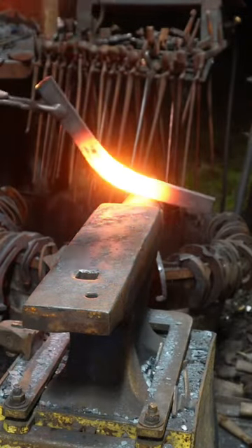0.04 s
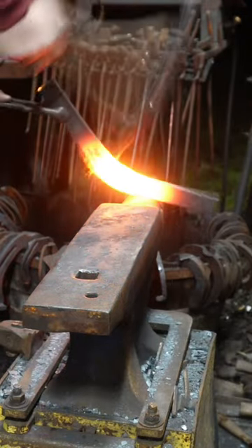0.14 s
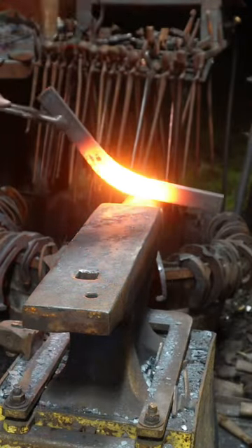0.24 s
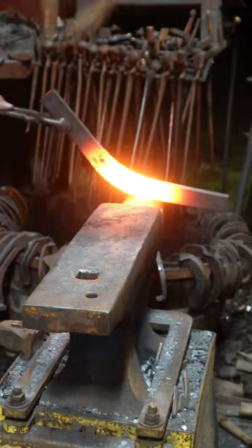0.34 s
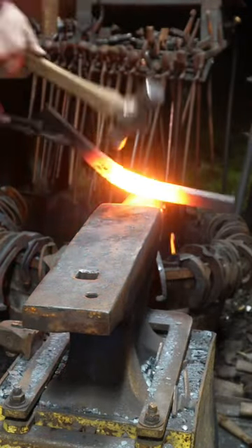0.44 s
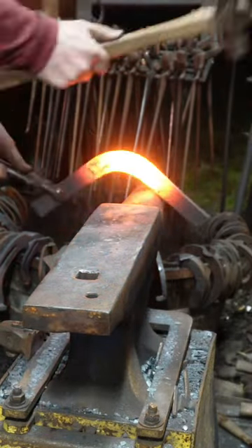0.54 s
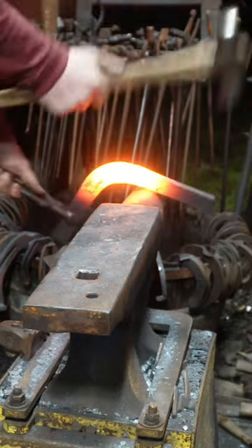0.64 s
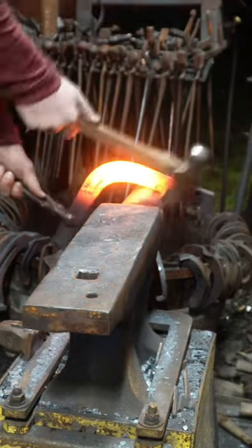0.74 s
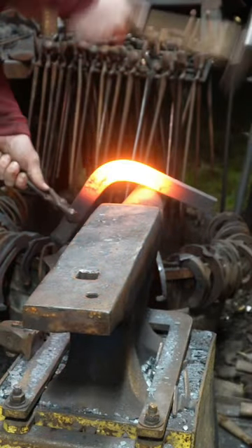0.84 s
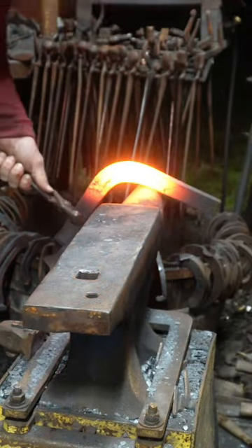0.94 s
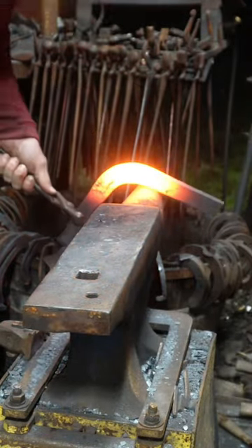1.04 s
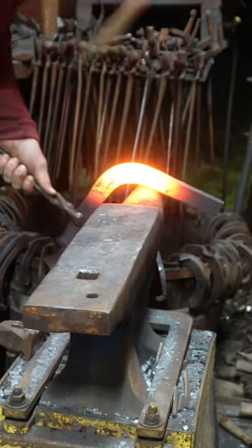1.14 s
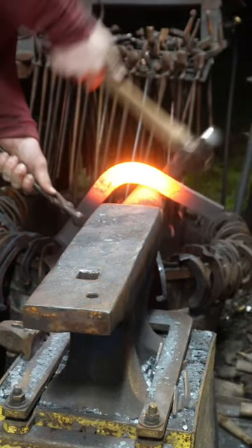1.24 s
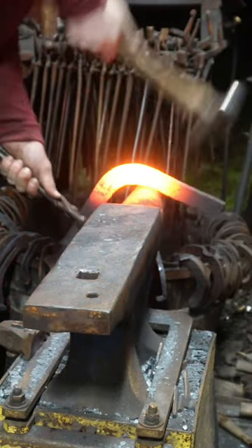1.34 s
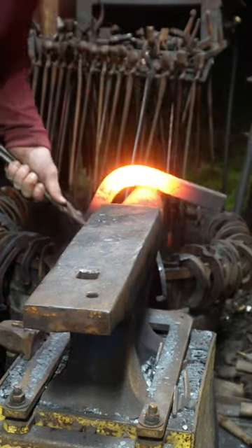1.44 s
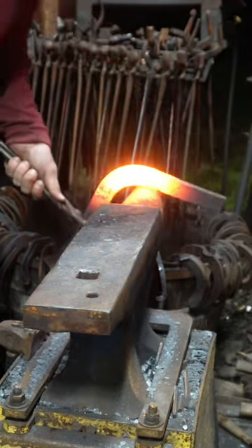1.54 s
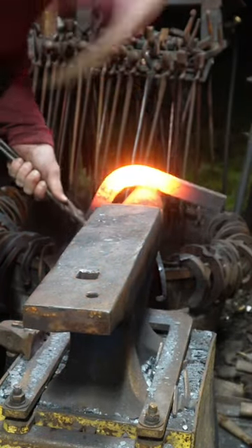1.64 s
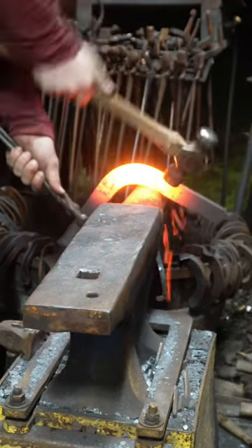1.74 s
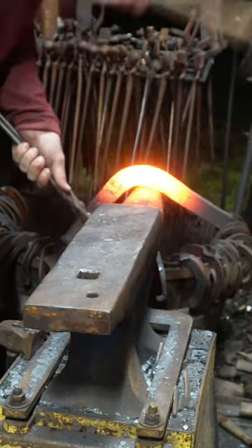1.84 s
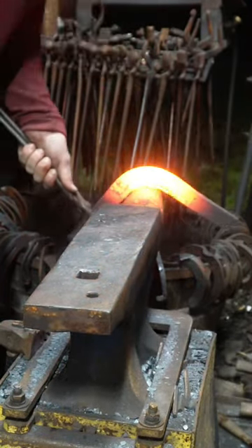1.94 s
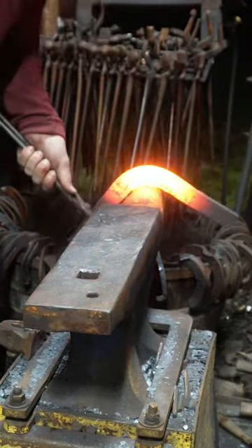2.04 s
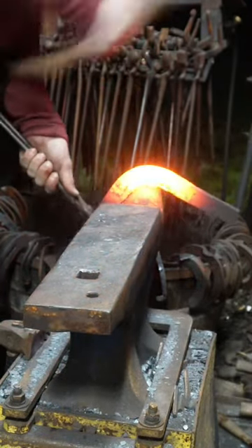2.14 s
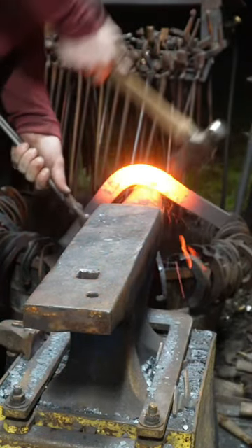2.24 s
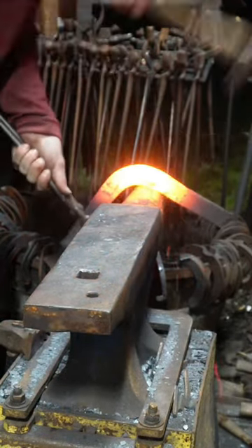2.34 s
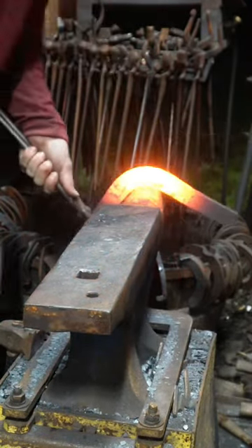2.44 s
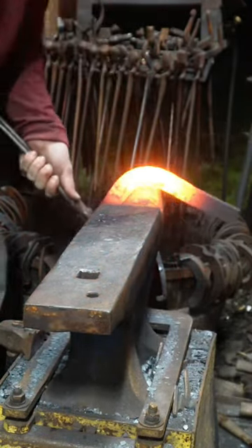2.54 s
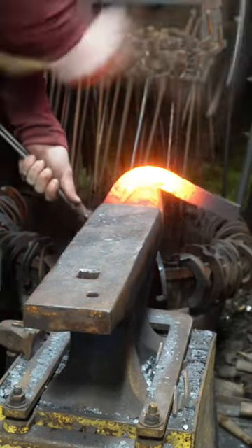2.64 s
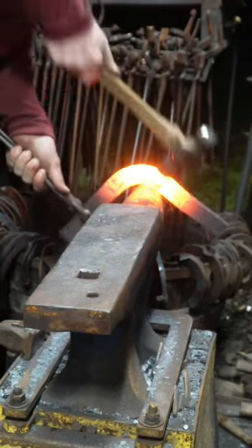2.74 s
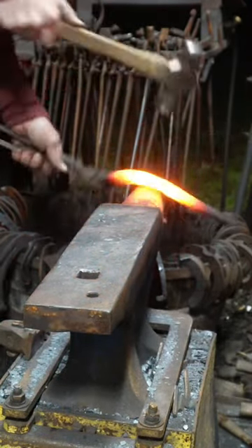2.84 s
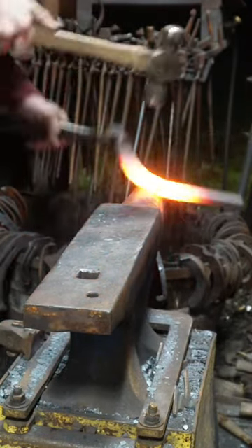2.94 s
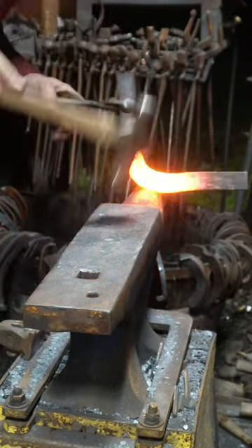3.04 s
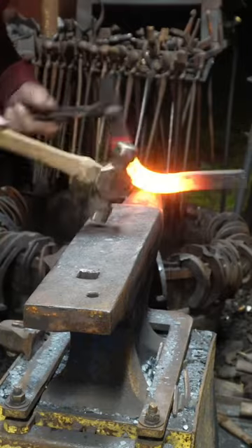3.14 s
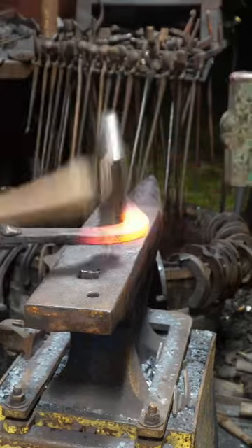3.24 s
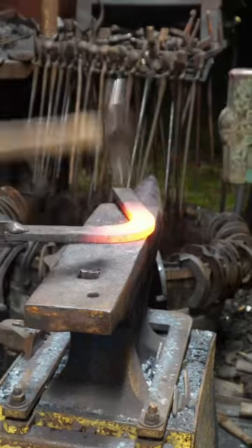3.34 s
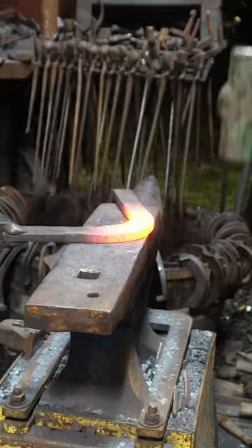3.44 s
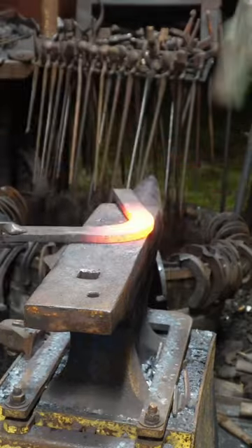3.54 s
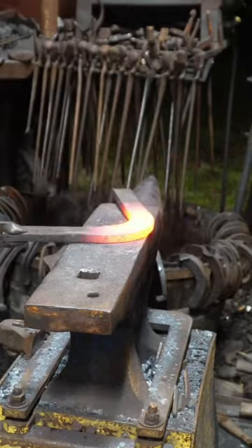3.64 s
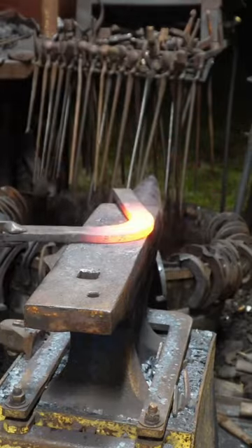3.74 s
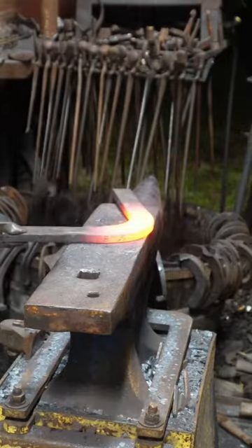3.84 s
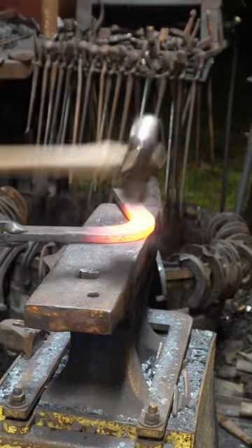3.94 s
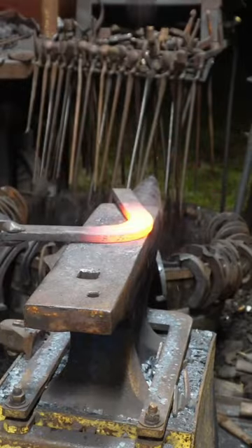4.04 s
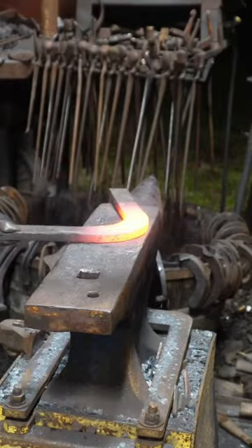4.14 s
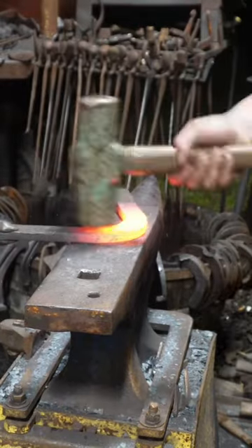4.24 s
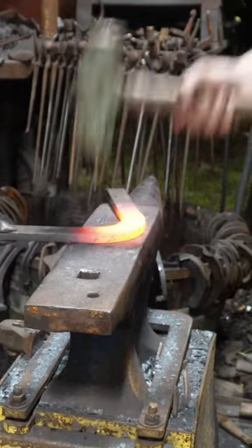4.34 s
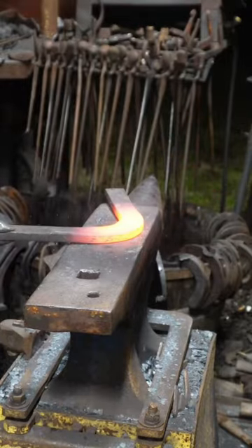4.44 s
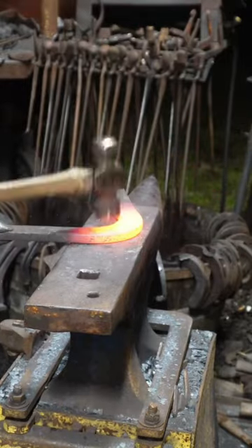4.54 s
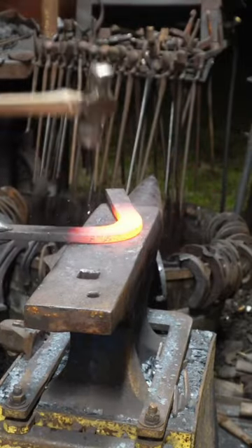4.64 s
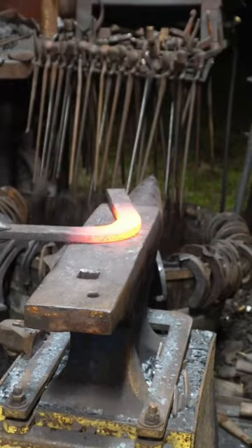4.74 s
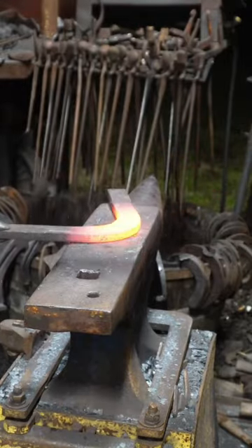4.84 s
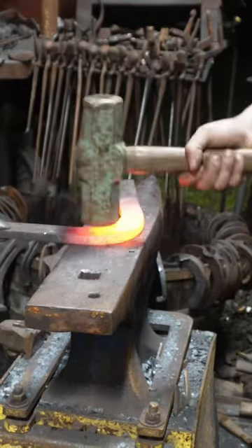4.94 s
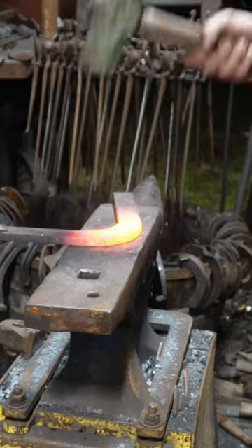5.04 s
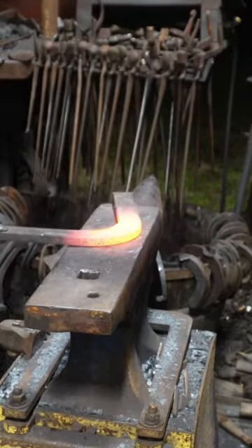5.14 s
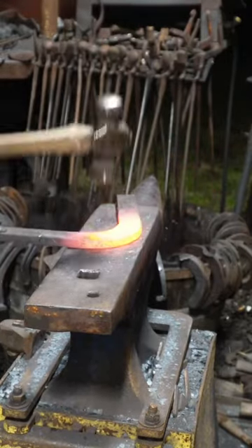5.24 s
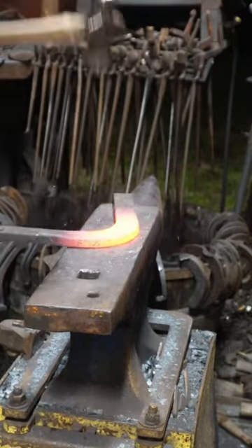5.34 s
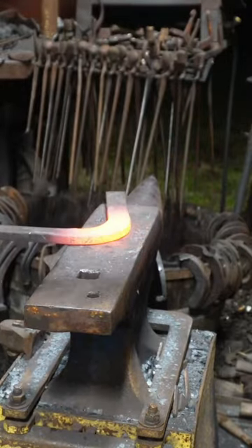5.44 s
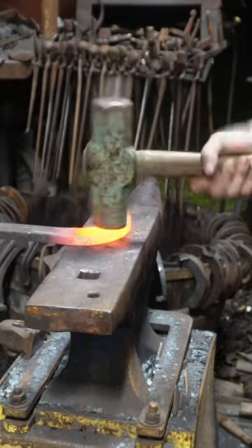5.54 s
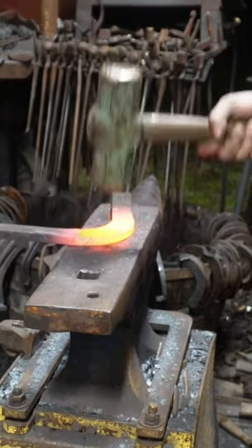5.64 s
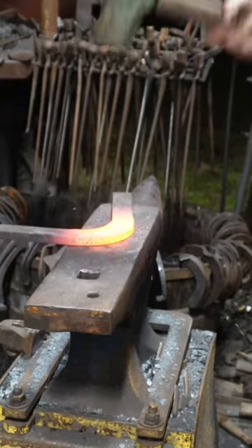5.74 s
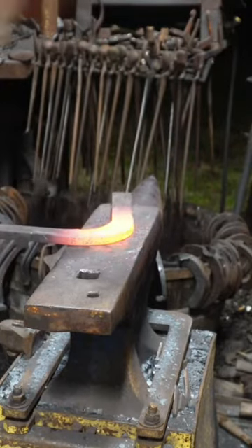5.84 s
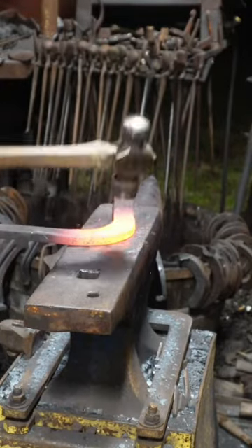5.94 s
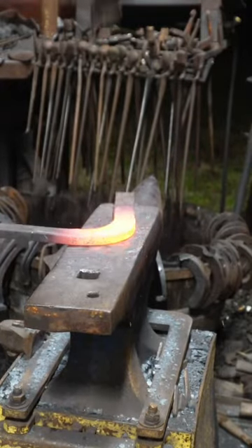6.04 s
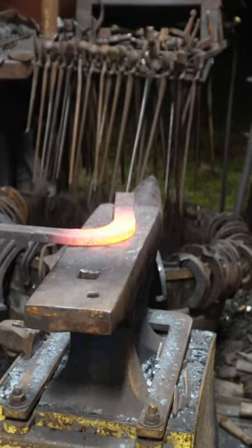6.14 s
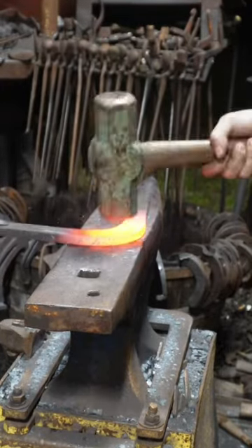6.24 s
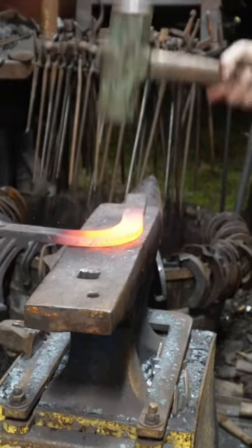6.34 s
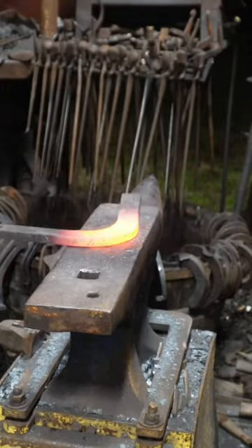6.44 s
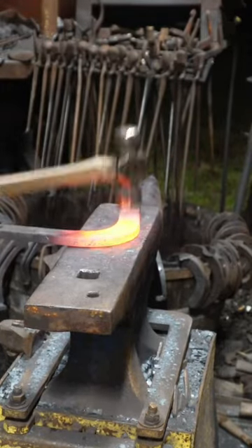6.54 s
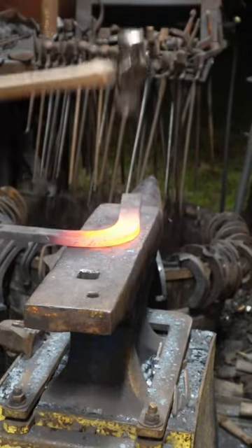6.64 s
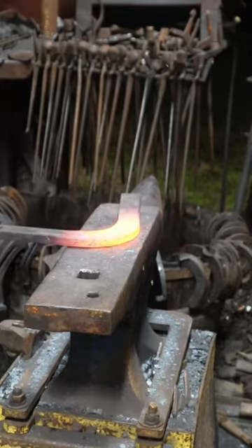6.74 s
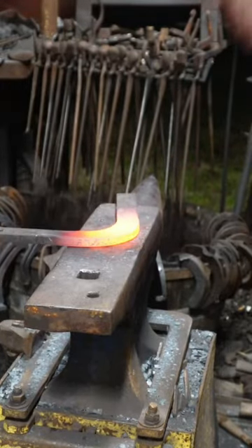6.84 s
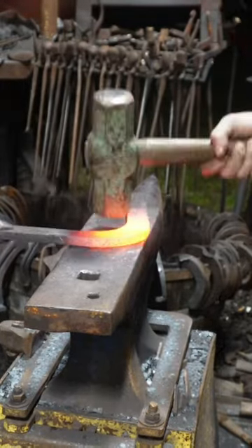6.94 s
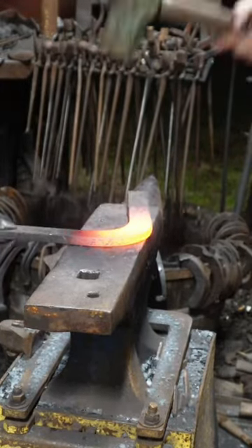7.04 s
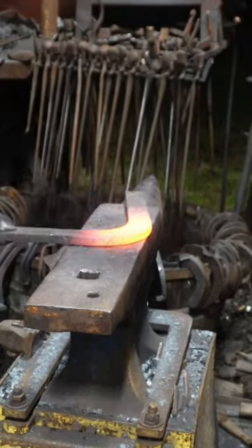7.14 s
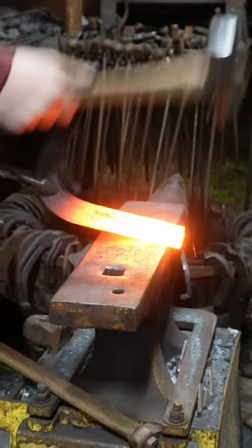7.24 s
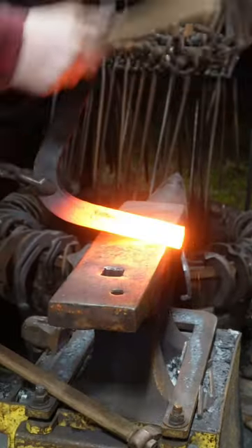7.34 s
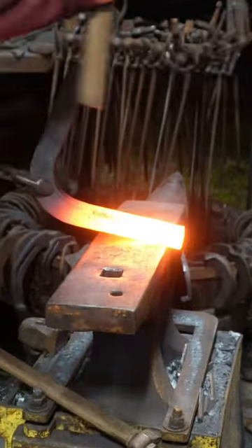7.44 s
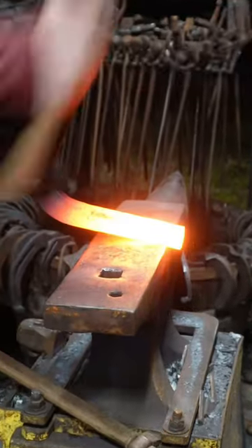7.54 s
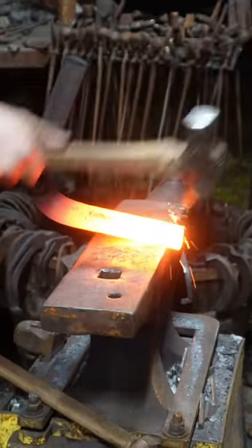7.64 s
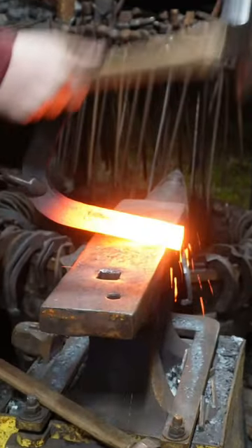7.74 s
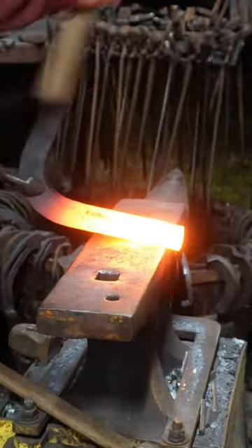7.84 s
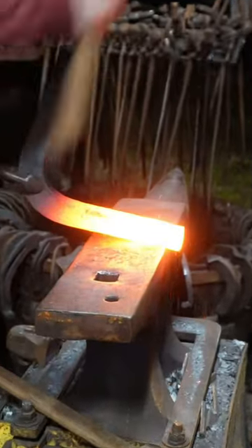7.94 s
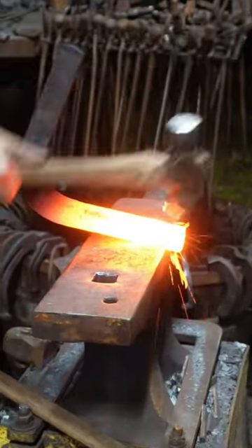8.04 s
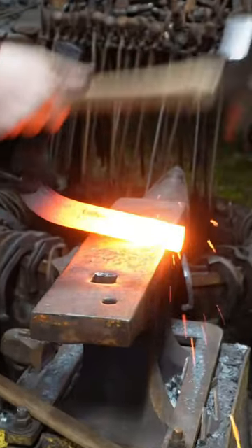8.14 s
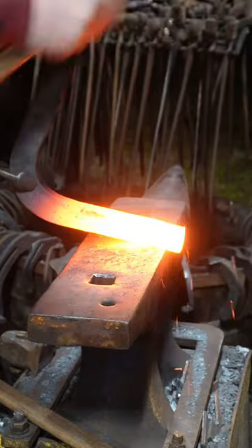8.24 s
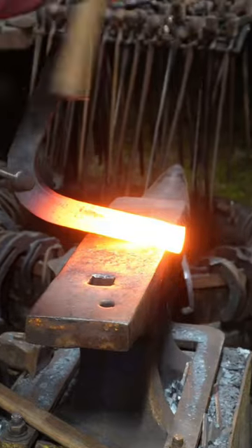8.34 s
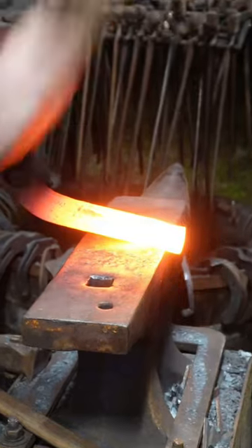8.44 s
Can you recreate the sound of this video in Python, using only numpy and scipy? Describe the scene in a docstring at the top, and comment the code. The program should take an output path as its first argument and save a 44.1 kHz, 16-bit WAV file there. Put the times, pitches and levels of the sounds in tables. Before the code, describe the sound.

Sharp, ringing hammer and sledgehammer blows strike a steel bar on an anvil, with short workshop echo and a steady forge hum and hiss.

```python
"""A smith's hand hammer bends a hot steel bar on an anvil; for a while a striker's sledge answers.
Each blow is a contact crack, a few ringing steel partials and a burst of workshop echo, squeezed by
a fast limiter. Behind them the forge hums and its air hisses. The opening sounds wider.
At three moments any ringing stops short and the forge shifts in level."""
import sys
import numpy as np
from scipy import signal
from scipy.fft import rfft, irfft
from scipy.io import wavfile
from scipy.ndimage import uniform_filter1d, minimum_filter1d

SR = 44100
rng = np.random.default_rng(int(sys.argv[2]) if len(sys.argv) > 2 else 0)


def generate_wav(sig):
    """Save sig (samples, or channels by samples) to the path in sys.argv[1] as 16-bit PCM at SR."""
    pcm = np.round(np.clip(np.atleast_2d(sig).T, -1, 1) * 32767).astype(np.int16)
    wavfile.write(sys.argv[1], SR, pcm)


N = 373968
TIME_S = np.arange(N) / SR
AGE_S = TIME_S[:16384]   # time since impact

# moments when ringing stops short and the forge level shifts: time_s
BREAKS_S = [0.45, 3.125, 7.205]


def from_db(db):
    """Decibels to gain."""
    return np.exp(np.asarray(db) * (np.log(10) / 20))


def at_hz(points, hz):
    """Interpolate a table over log frequency."""
    known_hz, values = np.transpose(points)
    return np.interp(np.log(hz + 1e-9), np.log(known_hz), values)


def drift(axis, knots_per_unit):
    """Random curve through unit-variance knots."""
    knots = rng.standard_normal(1024)
    return np.interp(axis * knots_per_unit, np.arange(len(knots)), knots)


def stereo_noise(colour, size):
    """Coloured noise, mono in the bass: (hz, stereo spectrum)."""
    # left-right likeness: freq_hz, correlation
    likeness = [(60, 1), (300, 1), (700, 1), (1400, 0.99), (2900, 0.99), (5000, 0.65), (8000, 0.2),
                (15000, 0.42)]
    hz = np.arange(size // 2 + 1) * SR / size
    mid, side = rfft(rng.standard_normal((2, size)))
    alike = at_hz(likeness, hz)
    gain = from_db(at_hz(colour, hz))
    gain /= np.sqrt(np.mean(gain ** 2))
    return hz, gain * (np.sqrt((1 + alike) / 2) * mid + np.sqrt((1 - alike) / 2) * side * [[1], [-1]])


def forge(flutter_db=1.0, waver_rad=0.11, fade_s=0.21):
    """The forge sings one note over the rush of its air: (hum, hiss)."""
    # forge note: pitch_hz, level_db
    harmonics = [(699.9, 0), (1399.8, -27)]
    # air rush spectrum: freq_hz, level_db
    air_colour = [(40, -3), (100, -32), (150, -29), (220, -2), (265, -12), (380, 2.5), (550, -4.5),
                  (1100, -1.5), (1500, 1), (2800, -3.5), (5300, -5), (7500, -16.5), (10000, -20.5),
                  (15000, -40.5)]
    # forge level, one row per stretch between breaks: hum_db, hiss_db
    levels = [(-39.5, -46.5), (-36, -41.5), (-36.5, -40), (-33.5, -41)]
    steps_db = np.transpose(levels)[:, np.searchsorted(BREAKS_S, TIME_S)]
    hum_db, hiss_db = uniform_filter1d(steps_db, size=int(fade_s * SR))
    wander_rad = waver_rad * drift(TIME_S, 47) + 1.8 * drift(TIME_S, 1.5)
    hum = sum(from_db(db) * np.sin(2 * np.pi * hz * TIME_S + wander_rad) for hz, db in harmonics)
    hiss = irfft(stereo_noise(air_colour, N)[1], N)
    hum_db += flutter_db * drift(TIME_S, 30)
    return np.sqrt(2) * hum * from_db(hum_db), hiss * from_db(hiss_db)


def widen(x, smear_s=0.0036, until_s=0.48, side_db=-2):
    """A short diffuse copy, opposite in the two channels, spreads the opening."""
    smear = (rng.standard_normal(len(AGE_S)) * np.exp(-AGE_S / smear_s))[AGE_S < 10 * smear_s]
    side = signal.fftconvolve(x.mean(axis=0), smear / np.linalg.norm(smear))[:N]
    opening = uniform_filter1d(1.0 * (TIME_S < until_s), size=1000)
    return x + from_db(side_db) * side * opening * [[1], [-1]]


def clash(colour, bass_db, treble_db, bass_hz=900, treble_hz=6300, peak_width_hz=55):
    """Dense steel and wall resonances, new at each blow: (hz, stereo spectrum)."""
    hz, noise = stereo_noise(colour, len(AGE_S))
    shelves_db = bass_db / (1 + (hz / bass_hz) ** 2) + treble_db * (1 - 1 / (1 + (hz / treble_hz) ** 6))
    spread_db = 4 * np.sqrt(hz / 5000)   # high resonances stand out more
    peaks_db = spread_db * drift(hz, 1 / peak_width_hz) - spread_db ** 2 / 13   # offset keeps the power
    return hz, noise * from_db(shelves_db + peaks_db)


def echo(colour, bass_db, treble_db, t60_s):
    """The clash as the walls return it; lows last longest."""
    # room decay by band: centre_hz, t60_ratio
    decay_bands = [(150, 1.6), (700, 1.15), (3500, 1.0), (10000, .87)]
    hz, spectrum = clash(colour, bass_db, treble_db)
    centres_hz, t60_ratios = np.transpose(decay_bands)
    out = 0
    for share, ratio in zip(np.eye(len(centres_hz)), t60_ratios):
        band = irfft(spectrum * at_hz(np.c_[centres_hz, share], hz))
        out += band * from_db(-60 * AGE_S / (t60_s * ratio))
    return out


def partials(modes, waver=0.7, waver_per_s=75, apart_hz=6000):
    """Decaying modes; wall reflections make each waver, and the high ones differ between the ears."""
    out = np.zeros((2, len(AGE_S)))
    for hz, db, t60_s in modes:
        swing = (1 + waver * drift(AGE_S, waver_per_s)) / np.sqrt(1 + waver ** 2)
        phase = 2 * np.pi * (hz * AGE_S + rng.random())
        apart_rad = min(hz / apart_hz, 1) * rng.uniform(0.029, 0.97)
        out += swing * from_db(db - 60 * AGE_S / t60_s) * np.cos([phase + apart_rad, phase - apart_rad])
    return out


def steel(head, groups_db):
    """Ringing steel and hammer head; the place of the blow sets each mode group's level."""
    # steel mode groups: pitch_hz, level_db, t60_s
    clang = [(1617, -3.5, .37), (1650, -6, .3), (1692, -5, .3), (1778, -5, .28), (1870, -11, .24)]
    bar = [(3982, 0, .24), (3445, -10, .28)]
    ring = [(5548, 2, .28), (4355, -7, .3), (11040, -16, .28), (15183, -25, .35)]
    ping = [(9435, 0, .38), (11040, -7, .26), (15570, -21, .3)]
    groups = [clang, bar, ring, ping, head]
    return sum(from_db(db) * partials(modes) for db, modes in zip(groups_db, groups))


def splash(colour, treble_db, gain_db=12, t60_s=0.019):
    """A brief, brighter clash, heard direct."""
    _, spectrum = clash(colour, 0, treble_db + 7)
    return irfft(spectrum[0]) * from_db(gain_db - 60 * AGE_S / t60_s)


def clink(head, gain_db=15, fade_s=0.026):
    """First swings of the hammer head, before the walls answer."""
    return partials(head, waver=0)[0] * from_db(gain_db - 60 * AGE_S / fade_s)


def crack(modes, bass_db, rebound_s=0.0015, rebound_db=-7, low_cut_hz=900, bass_below_hz=2000):
    """Damped swings as hammer meets bar and bar meets anvil; bass_db raises or lowers the low ones."""
    swings = 0
    for hz, db, t60_s in modes:
        level_db = db + bass_db * (hz < bass_below_hz) + 2 * rng.normal()
        pitch_hz = hz * (1 + 0.018 * rng.normal())
        swings += from_db(level_db - 60 * AGE_S / t60_s) * np.sin(2 * np.pi * pitch_hz * AGE_S)
    delay_s = rebound_s * rng.uniform(0.756, 1.292)
    swings += from_db(rebound_db) * np.interp(AGE_S - delay_s, AGE_S, swings, left=0)
    radiation = signal.butter(2, low_cut_hz, "high", fs=SR, output="sos")   # small bodies give no bass
    return signal.sosfilt(radiation, swings + 1e-18)


def hammer(stroke, singing, early_share=0.77, walls_s=0.0055, build_s=0.001):
    """One hand or sledge blow: direct contact, then ring and echo swell with the first reflections."""
    # how the bar lies and is hit, by stroke:
    # direct_db, bass_db, treble_db, echo_t60_s, clang_db, bar_db, ring_db, ping_db, head_db
    strokes = { "glance": (-16.5, -10, -1.5, 0.166, -14, -9, -22, -31, -32),
               "ringing": (4.5, -7.5, -9.5, 0.36, -14, -9, -7, -20.5, -11.5),
               "bend": (3, 9, -6.5, 0.31, -12, -23, -14.5, -30, -15),
               "flat": (2.5, -4, 4.5, 0.31, -13, -29, -15.5, -23, -16.5),
               "tip": (1.5, 10, -2.5, 0.27, -11, -16, -17.5, -23, -12),
               "sledge": (0.5, -0.5, -2.5, 0.3068, 1, -17, -16, -34, -14)}
    # mode group struck where it swings most: lift_db
    lifts_db = {"clang": 12.5, "bar": 17, "ring": 10, "ping": 13.5, "head": 14}
    # contact and hammer-head modes: pitch_hz, level_db, t60_s
    hand_crack = [(1070, -37, 0.031), (1517, -17, 0.018), (3460, -1, 0.015), (4054, -7, 0.0088),
                  (5600, -24, 0.01), (8200, -17.5, 0.0048)]
    hand_head = [(8240, -1, .2), (8200, -3, .18), (11250, -16, .22), (13430, -15, .23), (13380, -16, .2)]
    sledge_crack = [(1440, 3, 0.012), (1870, -6.5, 0.022), (3450, -9, 0.019), (5420, -16.5, 0.0078),
                    (6640, -11.5, 0.0085)]
    sledge_head = [(6965, 0, .3), (7010, -4, .25), (8716, -13, .6), (12060, -2, .22), (13007, -5.5, .3)]
    # splash and echo spectra: freq_hz, level_db
    hand_colour = [(40, -40), (100, -50), (150, -22.5), (200, -18), (280, -23.5), (400, -18), (800, -10),
                   (1600, 2), (2400, 2.5), (3600, 4), (5500, -1), (7500, -7.5), (10000, -15.5),
                   (13500, -26.5), (15500, -38)]
    sledge_colour = [(40, -32), (105, -31), (160, -9), (215, -7), (290, -11), (500, -9.5), (800, 1),
                     (1600, 3.5), (2300, 3.5), (3600, 0.5), (5500, 0), (7200, -1), (10000, -11),
                     (15500, -25)]
    if stroke == "sledge":
        contact, head, colour, crack_db = sledge_crack, sledge_head, sledge_colour, 19
    else:
        contact, head, colour, crack_db = hand_crack, hand_head, hand_colour, 14
    direct_db, bass_db, treble_db, t60_s, *groups_db = strokes[stroke]
    groups_db = [db + lifts_db[name] * (name in singing) for db, name in zip(groups_db, lifts_db)]
    impact = splash(colour, treble_db) + from_db(crack_db) * crack(contact, bass_db)
    direct = from_db(direct_db) * impact + from_db(groups_db[-1]) * clink(head)
    tail = steel(head, groups_db) + echo(colour, bass_db, treble_db, t60_s)
    swell = early_share + (1 - early_share) * (1 + np.tanh((AGE_S - walls_s) / build_s)) / 2
    rise_s = np.interp(direct_db, [-24, -8], [0.007, 0.0003])   # a glancing contact starts slowly
    return (1 - np.exp(-AGE_S / rise_s)) * (direct + swell * tail)


def scene():
    """Smith and striker over the forge; no blow rings past a break."""
    # hammer blows: start_s, force_db, stroke, singing_groups
    blows = [ (0.1164, -17.5, "glance", []), (.357, -18, "glance", []),
             (0.7066, -9.5, "ringing", ["clang"]), (1.1923, -11.5, "bend", ["clang"]),
             (1.679, -12.5, "bend", ["clang"]), (2.1663, -13, "bend", ["ping"]), (2.645, -12, "bend", []),
             (2.906, -39.5, "tip", []), (3.1064, -18.5, "ringing", []), (3.258, -8, "ringing", ["bar"]),
             (3.8602, -1.5, "flat", []), (4.2166, -5, "sledge", []), (4.5335, -3.5, "flat", ["head"]),
             (4.8895, -4, "sledge", []), (5.1976, -1.1, "flat", ["ping", "head"]),
             (5.5345, -2.5, "sledge", []), (5.8617, -3.5, "flat", []), (6.1921, -5, "sledge", ["ring"]),
             (6.5279, -0.5, "flat", ["ring"]), (6.8702, -2, "sledge", ["ring"]),
             (7.1932, -6, "flat", ["head"]), (7.5731, -13.5, "tip", []), (8.0215, -11.5, "tip", []),
             (8.4673, -14.5, "tip", [])]
    hum, hiss = forge()
    hammering = np.zeros((2, N))
    for start_s, force_db, stroke, singing in blows:
        start = round(start_s * SR)
        later_breaks = [round(break_s * SR) for break_s in BREAKS_S if break_s > start_s]
        stop = min(N, start + len(AGE_S), *later_breaks)
        hammering[:, start:stop] += from_db(force_db) * hammer(stroke, singing)[:, :stop - start]
    return widen(hammering + hiss) + hum


def limiter(x, threshold_db=-7.5, squeeze=0.71, release_db_per_s=750):
    """Peaks over the threshold duck both channels; gain returns within tens of milliseconds."""
    peak_db = 20 * np.log10(np.abs(x).max(axis=0) + 1e-9)
    over_db = np.maximum(peak_db - threshold_db, 0)
    recovery_db = release_db_per_s * TIME_S[:x.shape[1]]
    held_db = np.maximum.accumulate(over_db + recovery_db) - recovery_db
    cut_db = uniform_filter1d(minimum_filter1d(-held_db, size=45), size=45)
    return x * from_db(squeeze * cut_db)


def record(dry, ceiling=0.84, low_cut_hz=130, high_cut_hz=16200):
    """Limiter, reset at each break; then soft clip, high-pass and low-pass."""
    stretches = np.split(dry, [round(break_s * SR) for break_s in BREAKS_S], axis=1)
    limited = np.hstack([limiter(stretch) for stretch in stretches])
    rounded = limited / (1 + (limited / ceiling) ** 8) ** (1 / 8)
    thinned = signal.sosfilt(signal.butter(2, low_cut_hz, "high", fs=SR, output="sos"), rounded)
    return signal.sosfilt(signal.ellip(10, 0.1, 80, high_cut_hz, fs=SR, output="sos"), thinned)


dry = scene()
out = record(dry)
generate_wav(out)
```